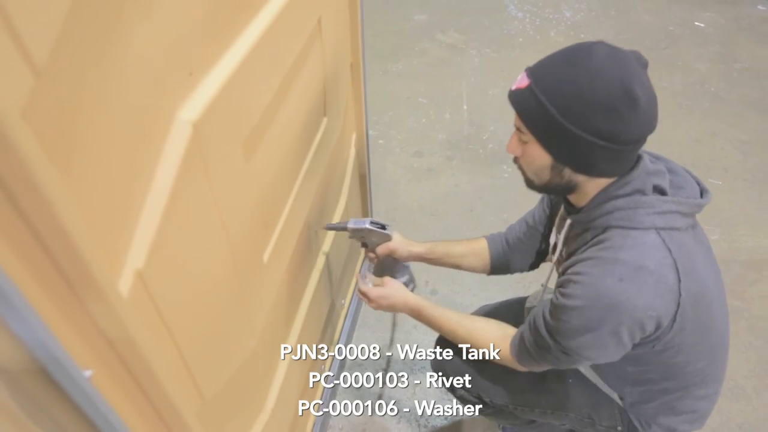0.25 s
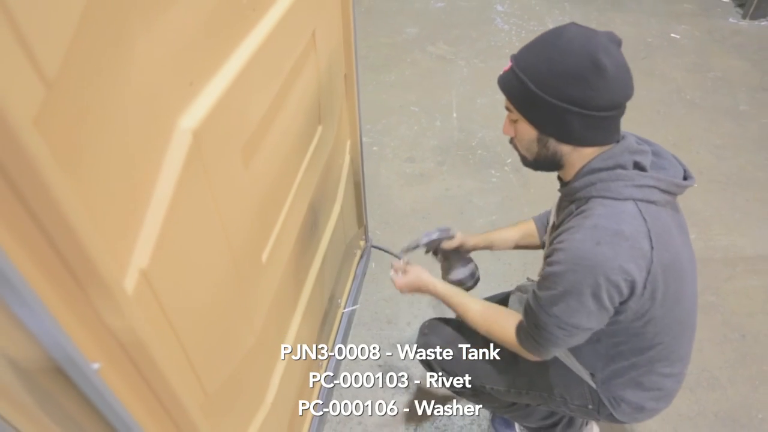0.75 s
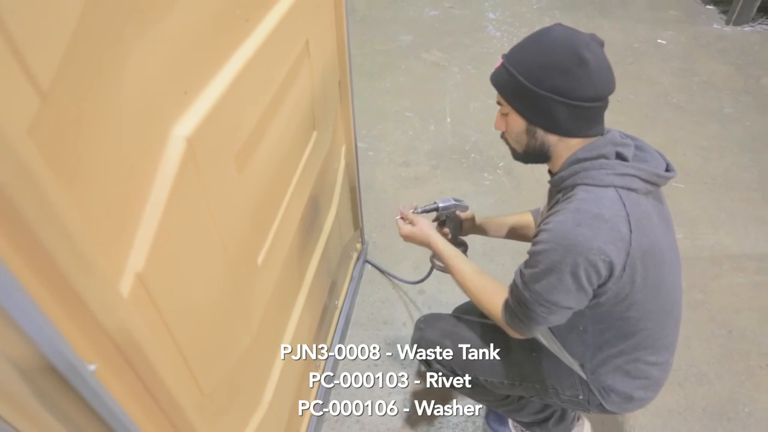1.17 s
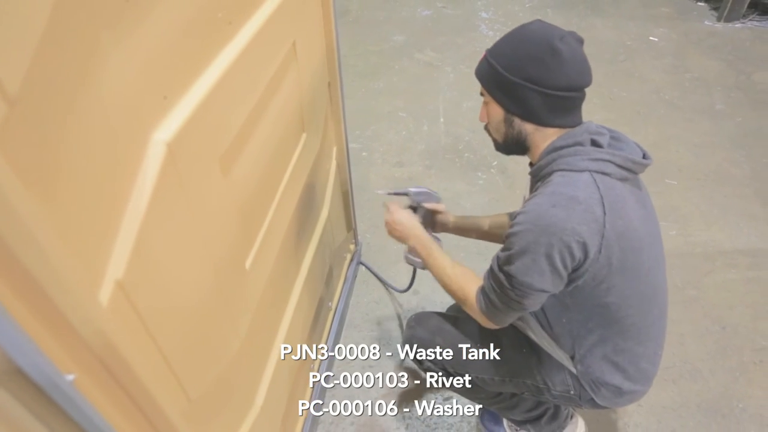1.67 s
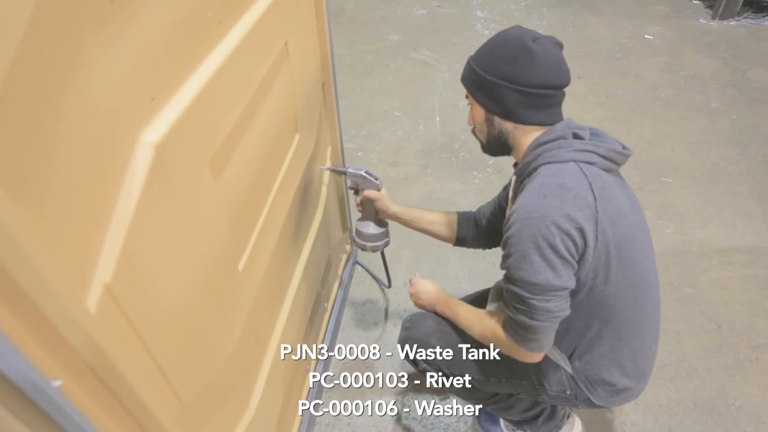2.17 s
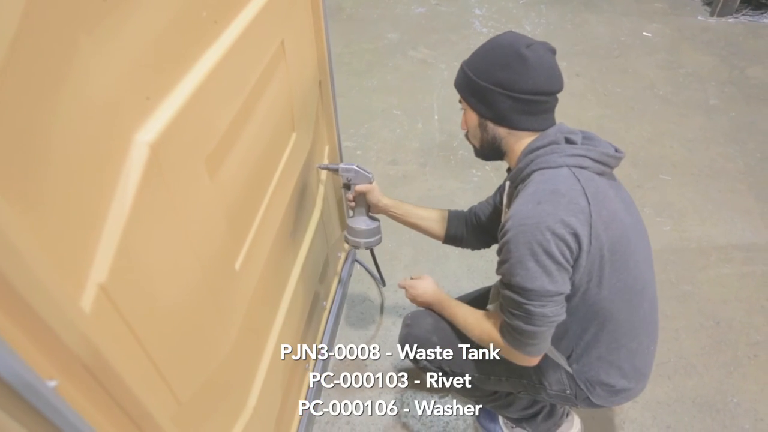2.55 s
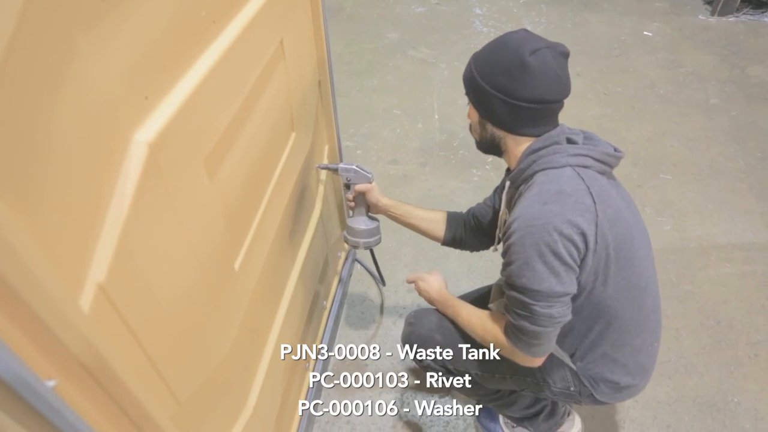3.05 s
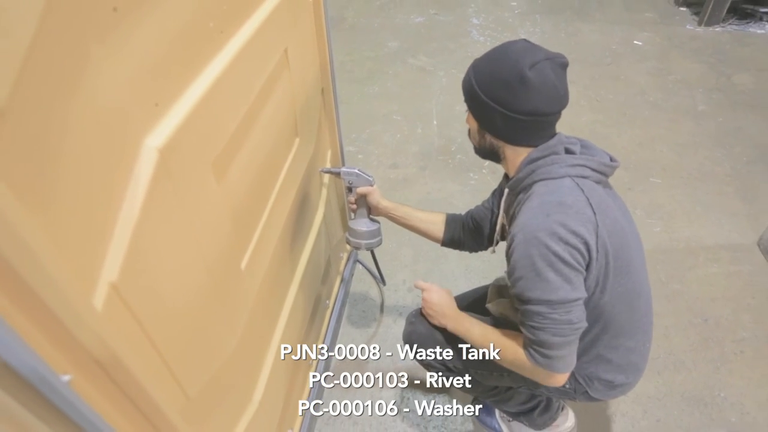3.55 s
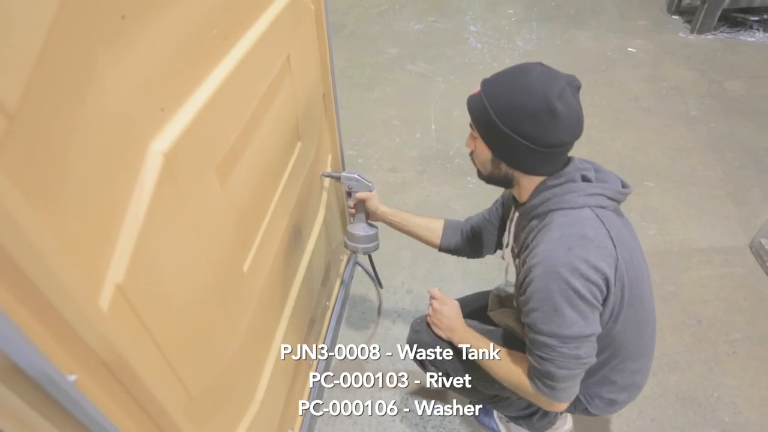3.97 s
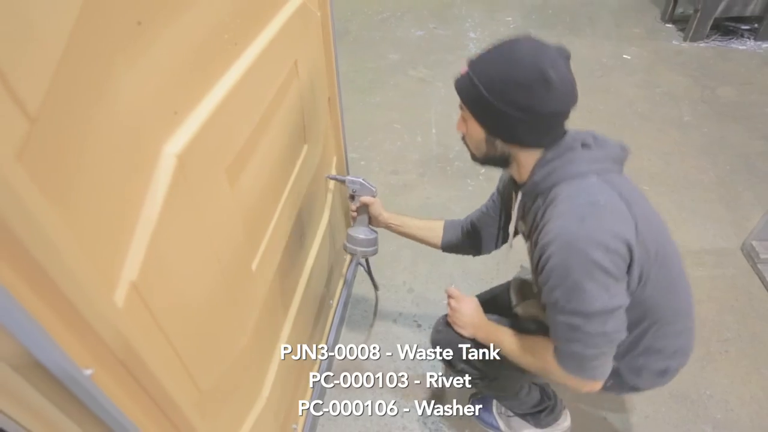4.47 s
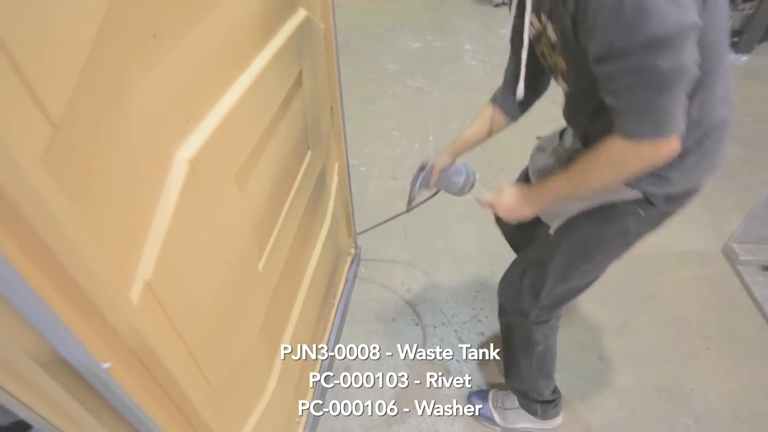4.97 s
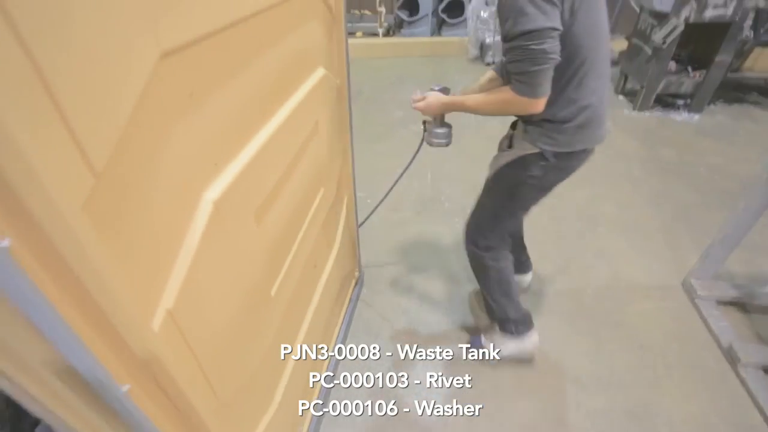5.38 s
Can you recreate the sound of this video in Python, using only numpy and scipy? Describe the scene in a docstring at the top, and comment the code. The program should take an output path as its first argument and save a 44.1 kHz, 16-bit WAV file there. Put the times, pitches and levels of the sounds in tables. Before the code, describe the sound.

A pneumatic rivet gun snaps loudly on a big hollow plastic panel, vents hissing air, knocks and clicks while reloading, then snaps again before footsteps.

```python
"""Pneumatic riveting on a hollow panel

A pneumatic rivet gun sets two rivets in a big hollow plastic panel, in a workshop with ventilation and hum.
Breaking mandrels crack as noise bursts and ring the panel's modes; air sings in valve and ports as filtered noise.
The gun vents with a fading hiss after each snap; between the two, a new rivet clicks in and the nose knocks.
At the end soles thud, clothes rub and the air hose slides along the floor; a diffuse hall answers tool and steps.
"""
import sys
import numpy as np
from scipy import signal
from scipy.fft import rfft, irfft, next_fast_len
from scipy.io import wavfile
from scipy.ndimage import map_coordinates

SR = 44100
rng = np.random.default_rng(int(sys.argv[2]) if len(sys.argv) > 2 else 0)


def transcribe(u):
    """Save the signal u as a 16-bit wav file named by the first command-line argument.

    u: samples, shape (n,) or (channels, n), limited to [-1, 1]; the rate is SR.
    q: integer samples, one column per channel.
    """
    v = np.clip(np.atleast_2d(u).T, -1, 1)
    q = np.round(v * 32767).astype(np.int16)
    wavfile.write(sys.argv[1], SR, q)


N = 247877
TIME = np.arange(N) / SR
AGE = TIME[:SR // 2]  # time after the start of one short event [s]

# Mandrel breaks: (time [s], crack level [dB], boom level [dB], contact cutoff [Hz], bass weight [dB],
# then the two wall modes that the spot favours: low mode [Hz], level [dB], middle mode [Hz], level [dB])
MANDREL_BREAKS = [(.0228, -8.5, -4, 1810, 2.5, 208, -0.5, 486.4, -1),
                  (4.3335, -8.5, -11.5, 2900, 0.5, 226.1, -9.5, 715, -9)]
# Bumps of the gun on the panel: (time [s], level [dB], contact cutoff [Hz], bass weight [dB],
# rebound relative to the bump [dB])
NOSE_BUMPS = [(.916, -35, 1500, -23, -8), (1.988, -25.5, 890, -.5, -13), (2.084, -32.5, 1420, 2, -3),
              (2.198, -30, 1910, -7, 3), (2.26, -31.5, 1100, 1, -11), (2.375, -27.5, 1700, -6, 3.5),
              (2.61, -38.5, 1400, -4, -12), (3.531, -36.5, 1200, -12, -12), (3.951, -13.5, 1080, 0.5, -7.5),
              (4.0844, -14, 1210, 0.5, -3.5), (4.215, -20, 1090, 1, -12)]
# Venting after the trigger is let go: (time [s], jet level [dB], opening [s], hold [s], jet fall [dB/s],
# deep port level [dB], high port level [dB], high port build-up [s])
CYLINDER_VENTS = [(.182, -15.5, 0.025, .112, 103, -30, -29, .16),
                  (4.461, -16, 0.015, .085, 84, -28, -29, 0.084)]


def amp(db):
    """Level to amplitude: 20 dB is a factor of ten."""
    return 10 ** (np.asarray(db) / 20)


def unit(x):
    """Normalization by the root mean square, to rms 1."""
    return x / np.sqrt(np.mean(x ** 2) + 1e-20)


def along(points, hz):
    """Logarithmic pitch scale: (frequency [Hz], value) points are interpolated on it."""
    point_hz, values = np.transpose(points)
    return np.interp(np.log(hz + 1), np.log(point_hz + 1), values)


def filtered(x, response):
    """Linear filtering: the spectrum of x is multiplied by a response of frequency."""
    m = next_fast_len(len(x) + SR // 4)
    spectrum = rfft(x, m) * response(np.fft.rfftfreq(m, 1 / SR))
    return irfft(spectrum, m)[:len(x)]


def noise(spectrum, size=N):
    """Coloured noise: white noise shaped by a spectral curve, rms 1."""
    return unit(filtered(rng.standard_normal(size), lambda hz: amp(along(spectrum, hz))))


def blown(modes):
    """Resonance driven by turbulence: white noise through (centre [Hz], width [Hz], level [dB]) peaks, rms 1."""
    def cavity(hz):
        power = sum(amp(db) ** 2 / (1 + ((hz - centre) / (width / 2)) ** 2) ** 1.5
                    for centre, width, db in modes)
        return np.sqrt(power)
    return unit(filtered(rng.standard_normal(N), cavity))


def wobble(rate):
    """Random modulation, slow or fast: a smooth curve through rate random knots a second."""
    knots = rng.standard_normal(int(N * rate / SR) + 4)
    return map_coordinates(knots, [TIME * rate])


def dying(x, decay):
    """Frequency-dependent damping: each band of x fades by its (frequency [Hz], t60 [s])."""
    hz, t, z = signal.stft(x, SR, nperseg=256)
    faded = z * amp(-60 * t / along(decay, hz)[:, None])
    return signal.istft(faded, SR, nperseg=256)[1][:len(x)]


def struck(t60, rise):
    """Exponential decay of an excited mode, after a short build-up."""
    return np.exp(-np.log(1000) * AGE / t60) * (1 - np.exp(-AGE / rise))


def swell(start, rise, hold, release, db):
    """Trapezoidal envelope: the amplitude rises straight, holds and falls straight."""
    rising = (TIME - start) / rise
    falling = 1 - (TIME - start - rise - hold) / release
    return amp(db) * np.clip(np.minimum(rising, falling), 0, 1)


def since(s):
    """Elapsed time after s seconds, zero before."""
    return np.maximum(TIME - s, 0)


def surge(s, rise, t60):
    """Transient flow: it builds from s seconds on and decays exponentially."""
    return (1 - np.exp(-since(s) / rise)) * np.exp(-np.log(1000) * since(s) / t60)


def add(track, s, sound):
    """Superposition: a sound is mixed into the track at s seconds."""
    start = max(round(s * SR), 0)
    track[start:start + len(sound)] += sound[:max(N - start, 0)]


def swing(hz, t60, rise=.005):
    """Damped oscillation: one mode of the wall swells and fades."""
    return (1 - np.exp(-AGE / rise)) * struck(t60, rise) * np.sin(2 * np.pi * hz * AGE)


def panel(contact_hz, weight_db, ring_db=-7, tank_db=-1.5):
    """Modal response to a blow: wall modes ring at once, the hollow builds up, soft contact loses the highs."""
    # Wall modes: (frequency [Hz], nominal level [dB], t60 [s])
    wall_modes = [(105.5, -3.5, 0.28), (174.5, 1, 0.11), (213, -9, 0.53), (339, -6, 0.26), (378, -5, 0.34),
                  (445, -6.5, 0.15), (487, -1, .18), (538.6, -6, 0.3), (582, -6, 0.23), (668, -5, 0.14),
                  (726, -3.5, 0.16), (887, -8, 0.16), (974, -5.5, 0.13), (1099, -4, 0.14),
                  (1261, -11, 0.13), (1382, -4.5, 0.086), (1553, -1, 0.06)]
    # Dense response of the hollow: (frequency [Hz], relative level per Hz [dB])
    hollow_colour = [(40, -30), (80, -2.5), (200, -1), (270, -5), (370, -2), (520, -2), (800, -5.5),
                     (1400, -10.5), (2000, -15), (4000, -14.5), (8000, -25), (16000, -33)]
    # Decay of the hollow: (frequency [Hz], t60 [s])
    hollow_decay = [(80, 0.47), (250, 0.54), (400, 0.28), (700, 0.24), (2000, 0.23), (10000, 0.16)]
    ring = np.zeros(len(AGE))
    for k, (hz, db, t60) in enumerate(wall_modes):
        level = amp(db + rng.normal(0, 1))  # no two blows excite a mode alike
        ring += (-1) ** k * level * struck(t60, 0.00052) * np.sin(2 * np.pi * hz * AGE)
    tank = dying(noise(hollow_colour, size=len(AGE)), hollow_decay) * (1 - np.exp(-AGE / 0.0045))
    body = amp(ring_db) * ring + amp(tank_db) * tank
    bass = signal.sosfilt(signal.butter(1, 240, fs=SR, output='sos'), body)
    weighted = body + (amp(weight_db) - 1) * bass
    contact = signal.butter(2, min(contact_hz, SR / 3), fs=SR, output='sos')
    return signal.sosfilt(contact, weighted)


def workshop(air_db=-43, drift=0.32):
    """Stationary background: broadband ventilation noise and machine hum of unsteady level and phase [rad]."""
    # Ventilation: (frequency [Hz], relative level per Hz [dB])
    ventilation = [(15, -42), (25, -9.5), (91, -6.5), (122, -6.5), (148, -10), (221, -8), (246, -14),
                   (289, -12), (331, -11.5), (598, -16), (648, -16.5), (4620, -34.5), (6050, -36.5),
                   (7500, -41), (15500, -36.5)]
    # Hum tones: (frequency [Hz], mean level [dB rms])
    hum_tones = [(120, -43.5), (215, -55), (297, -60.5), (371, -56), (597, -56), (1895, -68)]
    hum = np.zeros(N)
    for hz, db in hum_tones:
        level = amp(db + wobble(3.95))
        hum += level * np.sqrt(2) * np.sin(2 * np.pi * hz * TIME + drift * wobble(4.84))
    return hum + amp(air_db) * noise(ventilation)


def valve(opening=.003, closing=.015):
    """Flow noise in a constriction: supply air sings in the trigger valve until the gun vents."""
    # Valve resonances over a broad hiss: (centre [Hz], width [Hz], relative level [dB])
    valve_modes = [(3850, 670, -5.5), (6480, 130, 0), (7160, 110, -1), (8350, 300, -8), (10850, 200, 0),
                   (12950, 200, 2), (13750, 450, 7.5), (14450, 150, 5), (15400, 800, 3), (13000, 9500, -2)]
    lead_s = .131  # the trigger is pulled this long before each snap
    fill_db, sag_db_per_s = -37, 21
    spurt_db, spurt_t60 = -22, 0.064  # first rush into the empty cylinder
    free_db, free_rise_s, free_t60 = -29.5, .04, 0.51  # more air once the mandrel lets the piston go
    flow = np.zeros(N)
    for (snap, *_), (release, *_) in zip(MANDREL_BREAKS, CYLINDER_VENTS):
        pull = snap - lead_s
        steady = amp(fill_db - sag_db_per_s * since(pull))
        spurt = amp(spurt_db) * surge(pull, opening, spurt_t60)
        free_run = amp(free_db) * surge(snap, free_rise_s, free_t60)
        flow += swell(pull, opening, release - pull, closing, 0) * (steady + spurt + free_run)
    return flow * blown(valve_modes)


def low_booms(t60=0.23):
    """Low modes of the panel: ringing from an earlier contact, booms set off by the snaps, thumps of pushes."""
    # Booms: (time [s], level [dB], pitch [Hz])
    booms = [(0, -20, 175), (.026, -7, 116), (2.281, -26.5, 84.6), (2.37, -22.5, 73), (4.211, -10.5, 83),
             (4.336, -15, 78.4)]
    out = np.zeros(N)
    for s, db, hz in booms:
        add(out, s, amp(db) * swing(hz, t60))
    return out


def snaps(recoil=0.002986, rebound=.006, rebound_db=-7, low_hz=100, rattle_db=2,
          low_t60=.23, middle_t60=0.11, middle_lag=.008):
    """Sudden fracture: the mandrel cracks and rattles back; the recoil drives the panel's favoured modes."""
    # Breaking steel: (frequency [Hz], relative level per Hz [dB])
    steel_colour = [(300, 10), (1200, 3), (3000, 0.5), (5000, -2.5), (6700, 2), (8200, -3), (11000, 1.5),
                    (13000, 2), (16000, -8)]
    # Decay of the steel: (frequency [Hz], t60 [s])
    steel_decay = [(1000, 0.24), (5000, 0.11), (15000, 0.11)]
    steel, boom = np.zeros((2, N))
    for (s, crack_db, boom_db, contact_hz, weight_db,
         bass_hz, bass_db, middle_hz, middle_db) in MANDREL_BREAKS:
        for delay, db in [(0, crack_db), (rebound, crack_db + rebound_db)]:
            burst = dying(noise(steel_colour, size=len(AGE)), steel_decay)
            add(steel, s + delay, amp(db) * burst * (1 - np.exp(-AGE / 0.0002)))
        slam = amp(boom_db) * panel(contact_hz, weight_db)
        add(boom, s + recoil, slam + amp(bass_db) * swing(bass_hz, low_t60))
        add(boom, s + middle_lag, amp(middle_db) * swing(middle_hz, middle_t60))
    low_cut = signal.butter(4, low_hz, 'high', fs=SR, output='sos')
    return steel * amp(rattle_db * wobble(800)) + signal.sosfilt(low_cut, boom)


def exhaust(flutter_db=0.92, sink_per_s=.2, sink_s=.25):
    """Jet noise and cavity resonance: the jet fades faster than the port tones, whose pitch sinks."""
    # Bright jet: (frequency [Hz], relative level per Hz [dB])
    jet_colour = [(300, -17), (900, -8), (2000, -6), (2700, -9), (4000, -7), (5200, -8.5), (6400, -5),
                  (7500, -7.5), (8700, -2.5), (10300, -2), (11500, -3), (13500, 1), (16000, -2.5)]
    # Exhaust cavity, deep port modes: (centre [Hz], width [Hz], relative level [dB])
    deep_modes = [(1010, 260, -3.5), (1560, 490, 2), (2170, 210, -4.5)]
    # High port modes: (centre [Hz], width [Hz], relative level [dB])
    high_modes = [(3730, 770, -3), (6160, 1200, -10.5)]
    deep_fall_db_per_s, deep_build_s = 58, 0.026
    high_fall_db_per_s, high_lag_s = 62, 0.052  # the high tone holds longer than the jet
    # The returning piston squeezes out a thin hiss until it seats
    return_s, return_db, return_fall_db_per_s, return_low_hz, seat_s = 0.494, -29, 25.5, 8240, .04
    out = np.zeros(N)
    jet, deep, high = noise(jet_colour), blown(deep_modes), blown(high_modes)
    thin = unit(filtered(noise(jet_colour), lambda hz: hz ** 4 / (hz ** 4 + return_low_hz ** 4)))
    for s, jet_db, opening, hold, fall_db, deep_db, high_db, build in CYLINDER_VENTS:
        age, draining = since(s), since(s + hold)
        opened = np.minimum(age / opening, 1) ** 2
        # Reading the tones ever more slowly for sink_s seconds lowers their pitch
        place = np.cumsum(1 + sink_per_s * (sink_s / 2 - np.minimum(draining, sink_s)))
        deep_bent = np.interp(place % N, np.arange(N), deep)
        high_bent = np.interp(place % N, np.arange(N), high)
        deep_gain = amp(deep_db - deep_fall_db_per_s * draining) * (1 - np.exp(-age / deep_build_s))
        high_gain = amp(high_db - high_fall_db_per_s * since(s + hold + high_lag_s))
        ports = deep_gain * deep_bent + high_gain * np.minimum(age / build, 1) * high_bent
        piston_db = return_db - return_fall_db_per_s * age
        piston = swell(s, hold, return_s - hold, seat_s, piston_db) * thin
        out += opened * (amp(jet_db - fall_db * draining) * jet + ports + piston)
    return out * amp(flutter_db * wobble(60))


def whistles(waver_db=1):
    """Aeroacoustic tones: air squeezes through small gaps, a thin tone blurred by turbulence."""
    # Leaks: (start [s], end [s], fade [s], pitch [Hz], width [Hz], noise share of power [0-1], level [dB])
    leaks = [(1.07, 1.39, 0.13, 3150, 54, 0.1, -60.5), (0.89, 1.61, 0.15, 5930, 60, 0.6, -65),
             (5.43, 5.7, 0.016, 15380, 220, 1, -36), (5.45, 5.62, .04, 5730, 120, 1, -57)]
    out = np.zeros(N)
    for start, end, fade, hz, width, noisy, db in leaks:
        gate = np.clip(np.minimum(TIME - start, end - TIME) / fade, 0, 1)
        band = unit(filtered(rng.standard_normal(N), lambda f: np.exp(-((f - hz) / width) ** 2)))
        share = np.clip(noisy, 0, 1)
        tone = np.sqrt(2) * np.sin(2 * np.pi * hz * TIME)
        out += gate * amp(db) * (np.sqrt(share) * band + np.sqrt(1 - share) * tone)
    return out * amp(waver_db * wobble(10))


def clicks(t60=0.13, spike_t60=0.0086, spike_db=7.5, ring_db=-2, peak_db=6, spread=0.18):
    """Impact of stiff bodies: a sharp spike, then a short ring of the steel part, damped by the hand."""
    # Contacts of rivet and gun: (time [s], level [dB], treble tilt [dB per octave], ringing [Hz])
    contacts = [(.8923, -34.5, 0, 11000), (.913, -31.5, -2, 11000), (1.0048, -35.5, -3, 3330),
                (1.6763, -47, 2, 13000), (1.984, -27, 3, 4100), (2.1996, -44.5, 2, 13300),
                (2.376, -39, -4.5, 3800), (2.456, -48, 2, 4100), (2.6077, -38, 4.5, 5770),
                (3.119, -39, 2.5, 14500), (3.5301, -44.5, -.5, 3800), (4.0862, -26.5, -6.5, 2500),
                (4.206, -27.5, -3, 10800)]
    # Click before its tilt and ringing peak: (frequency [Hz], relative level per Hz [dB])
    tick_colour = [(400, 1), (1200, 7.5), (1900, 2), (3400, 2), (6000, -5), (7500, -5), (12000, -5.5),
                   (16000, -5)]
    out = np.zeros(N)
    shape = amp(spike_db) * struck(spike_t60, .0003) + amp(ring_db) * struck(t60, 0.0014)
    # The loose jaws click 28 ms after each bump, 20 dB below its level
    rattles = [(s + .028, db - 20, -2.5, 7000) for s, db, *_ in NOSE_BUMPS]
    for s, db, tilt_db, ring_hz in list(contacts) + rattles:
        colour = [(hz, v + tilt_db * np.log2(hz / 4000)) for hz, v in tick_colour]
        part = lambda f: amp(peak_db * np.exp(-((f / ring_hz - 1) / spread) ** 2))
        ringing = unit(filtered(noise(colour, size=len(AGE)), part))
        add(out, s, amp(db) * ringing * shape)
    return out


def knocks():
    """Impact excitation: as the nose hunts for the hole, each bump rings and swings the panel and rebounds."""
    swing_hz, swing_db, swing_t60 = 76.4, -4, 0.095  # each bump also swings the whole wall
    rebound_s, rebound_contact_hz, rebound_weight_db = .015, 810, -8  # the nose lands again
    out = np.zeros(N)
    for s, db, contact_hz, weight_db, rebound_db in NOSE_BUMPS:
        wall = amp(swing_db + weight_db) * swing(swing_hz, swing_t60)
        add(out, s, amp(db) * (panel(contact_hz, weight_db) + wall))
        add(out, s + rebound_s, amp(db + rebound_db) * panel(rebound_contact_hz, rebound_weight_db))
    return out


def steps():
    """Soft impact: rubber soles roll onto the concrete, a short hollow thud with some scuffing."""
    # Footfalls: (time [s], level [dB], pitch [Hz], time to peak [s], scuff relative to thud [dB])
    footfalls = [(4.837, -41, 421, 0.025, 8), (5.063, -37, 532, .01, 4), (5.381, -30, 264, 0.0135, -12)]
    # Scuffing sole: (frequency [Hz], relative level per Hz [dB])
    sole_colour = [(120, -7), (350, 2), (600, -0.5), (850, -11), (1200, -9), (2200, -23), (8000, -39)]
    out = np.zeros(N)
    for s, db, hz, length, scuff_db in footfalls:
        roll = (AGE / length * np.exp(1 - AGE / length)) ** 2
        thud = np.sqrt(2) * np.sin(2 * np.pi * hz * AGE)
        scuff = amp(scuff_db) * noise(sole_colour, size=len(AGE))
        add(out, s, amp(db) * roll * (thud + scuff))
    return out


def getting_up(grain_db=0.5):
    """Friction noise: clothes rub and the hose slides on concrete, with a fine random grain."""
    # Rubbing clothes: (time [s], level [dB], rise [s], hold [s], release [s])
    rubs = [(5.10, -43.5, .08, 0.076, 0.15)]
    # Cloth: (frequency [Hz], relative level per Hz [dB])
    fabric_colour = [(700, 7.5), (1800, -3), (2400, 10), (2750, 0), (3200, 7), (4800, -3), (6400, 0),
                     (9000, -2.5), (16000, -5.5)]
    # Sliding hose: (time [s], level [dB], rise [s], hold [s], release [s])
    slides = [(5.40, -40, 0.087, .11, .2)]
    # Hose on concrete: (frequency [Hz], relative level per Hz [dB])
    scrape_colour = [(150, 11), (350, 3), (700, -1.5), (1700, -2), (3000, -5), (5700, -8.5), (7500, -23),
                     (16000, -30)]
    strokes = lambda rows: sum(swell(s, rise, hold, release, db) for s, db, rise, hold, release in rows)
    clothes = strokes(rubs) * noise(fabric_colour)
    hose = strokes(slides) * noise(scrape_colour)
    return amp(grain_db * wobble(120)) * (clothes + hose)


def near_walls(x, echo=0.1, count=6):
    """Early reflections: panel, floor and worker return weak copies 1 to 14 ms late that comb the sound."""
    copies = sum(np.pad(x, (int(s * SR), 0))[:N] for s in rng.uniform(.001, .014, count))
    return (x + echo * copies) / np.sqrt(1 + count * echo ** 2)


def hall(x):
    """Diffuse reverberation: convolution with decaying noise of unit energy."""
    # Reverberation: (frequency [Hz], t60 [s])
    hall_decay = [(100, 1), (500, 0.63), (3500, 0.93), (8000, 0.43), (15000, 0.24)]
    tail = dying(rng.standard_normal(SR), hall_decay) * (1 - np.exp(-TIME[:SR] / 0.015))
    return signal.fftconvolve(x, tail / np.linalg.norm(tail))[:N]


def scene(hits_wet_db=-19, air_wet_db=-14):
    """Direct and reverberant field: tool and panel close by, the hall behind them."""
    hits = low_booms() + snaps() + clicks() + knocks() + steps()
    hiss = near_walls(valve() + exhaust())
    wet = hall(amp(hits_wet_db) * hits + amp(air_wet_db) * hiss)
    return (hits + hiss + wet + workshop() + whistles() + getting_up())[None]


def record(dry, low_cut_hz=32, top_hz=15850):
    """Overload and band limiting: peaks clip at full scale, then deep rumble and the top are cut."""
    clipped = np.clip(dry[0], -1, 1)

    def band(hz):
        low_cut = hz ** 2 / np.sqrt(hz ** 4 + low_cut_hz ** 4)
        return low_cut / (1 + (hz / top_hz) ** 300)
    return filtered(clipped, band)[None]


dry = scene()
out = record(dry)
transcribe(out)
```